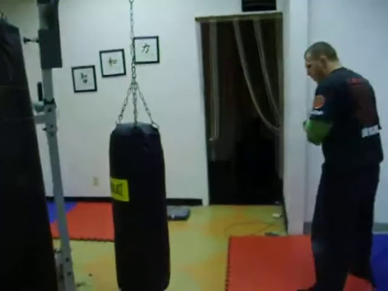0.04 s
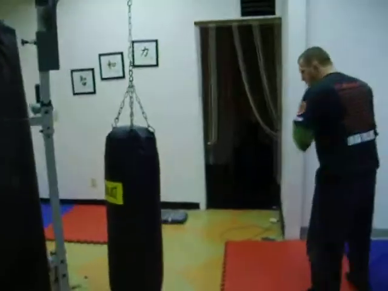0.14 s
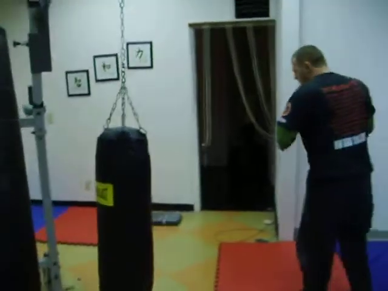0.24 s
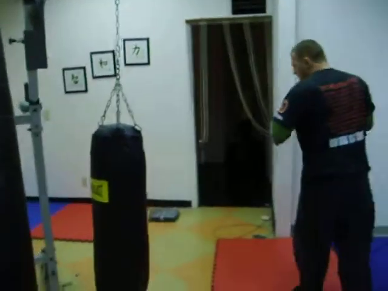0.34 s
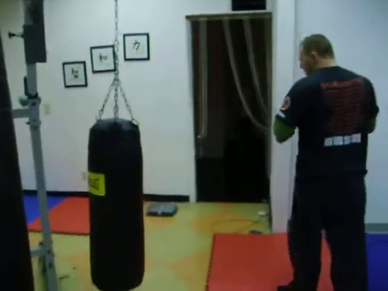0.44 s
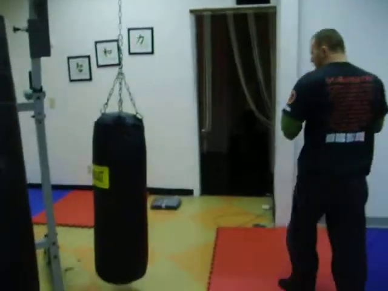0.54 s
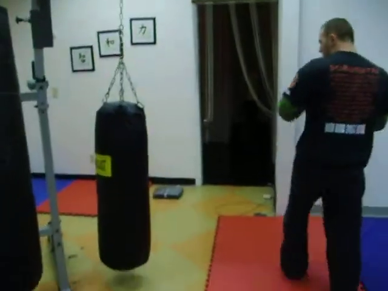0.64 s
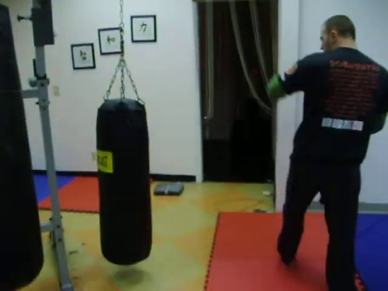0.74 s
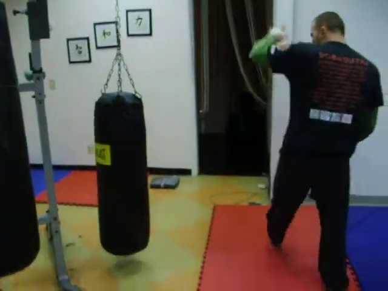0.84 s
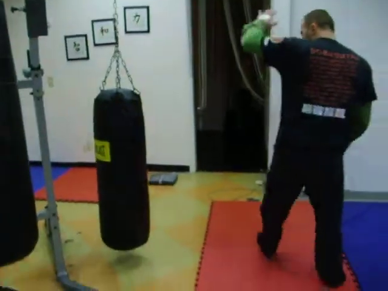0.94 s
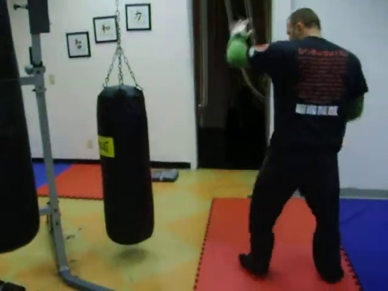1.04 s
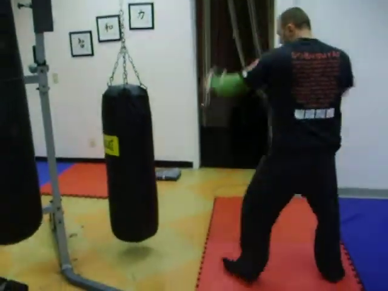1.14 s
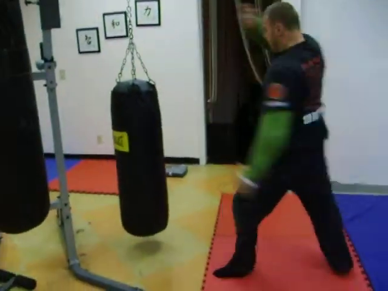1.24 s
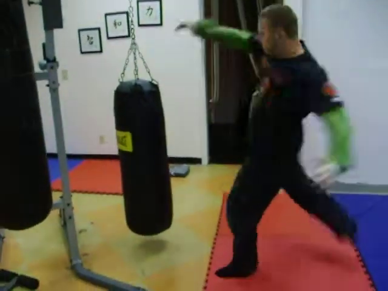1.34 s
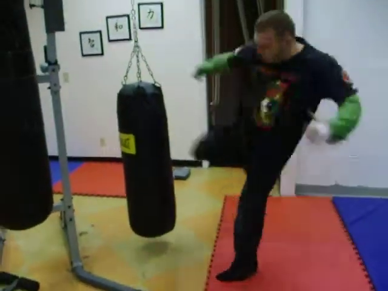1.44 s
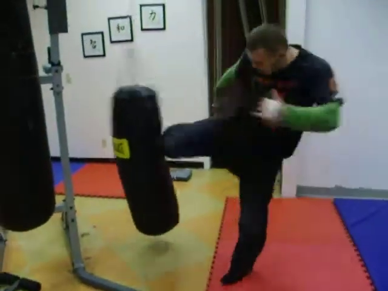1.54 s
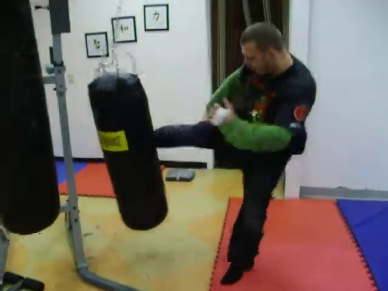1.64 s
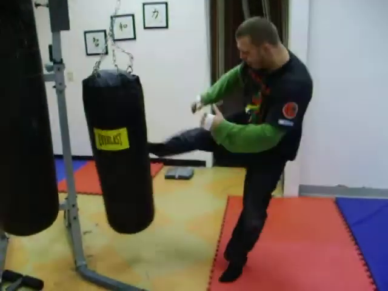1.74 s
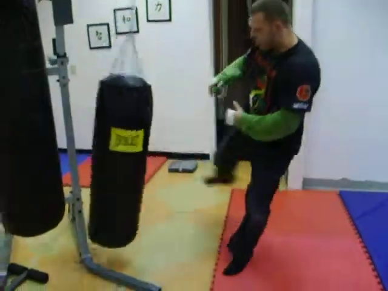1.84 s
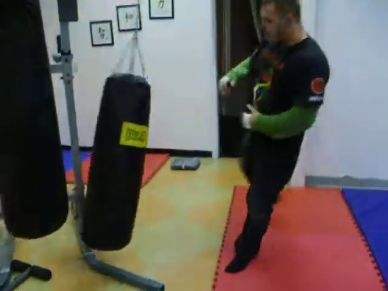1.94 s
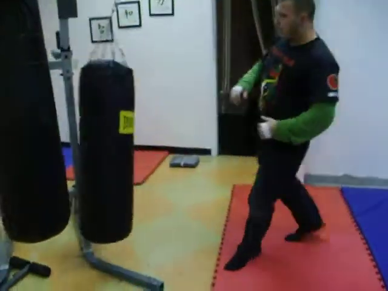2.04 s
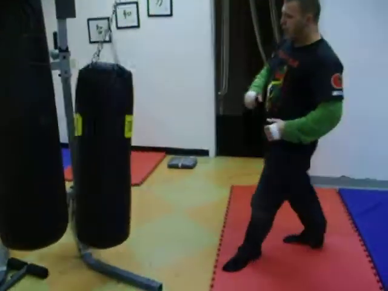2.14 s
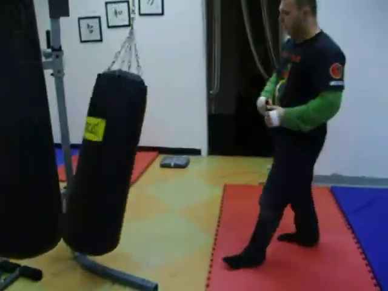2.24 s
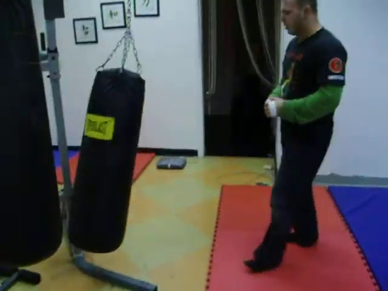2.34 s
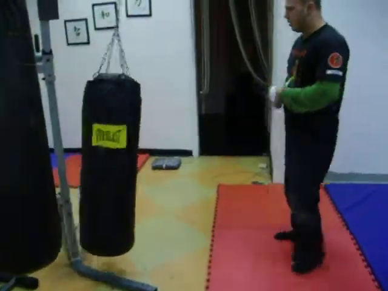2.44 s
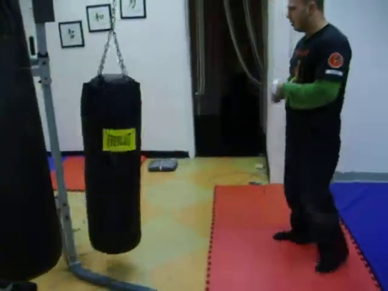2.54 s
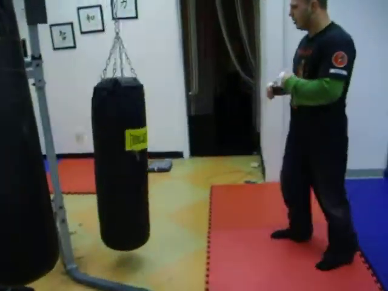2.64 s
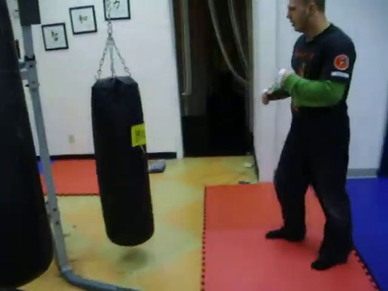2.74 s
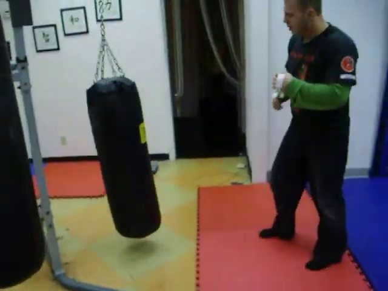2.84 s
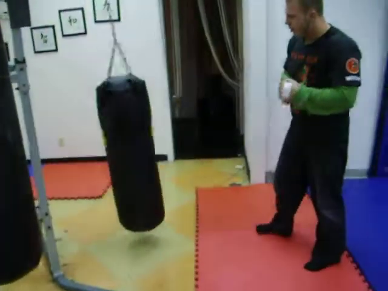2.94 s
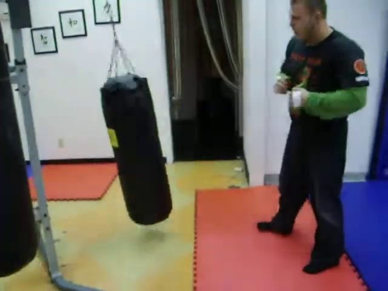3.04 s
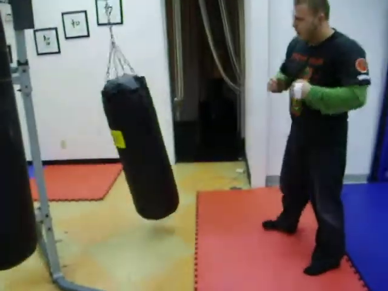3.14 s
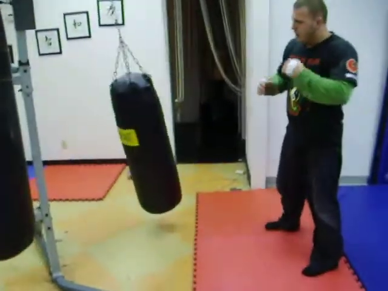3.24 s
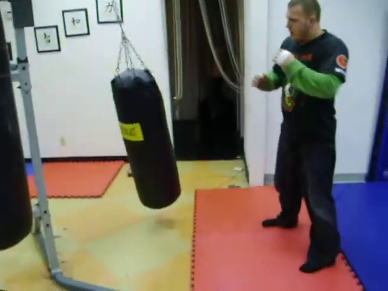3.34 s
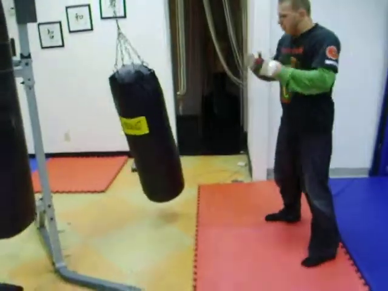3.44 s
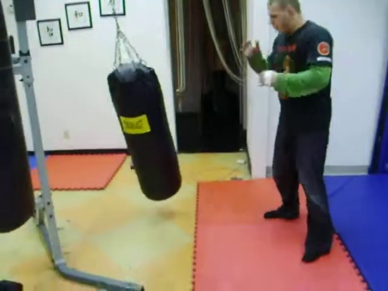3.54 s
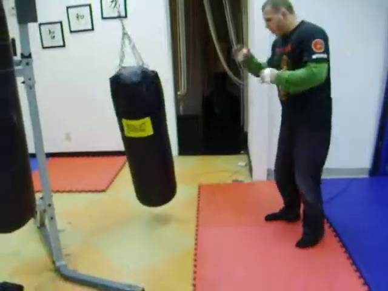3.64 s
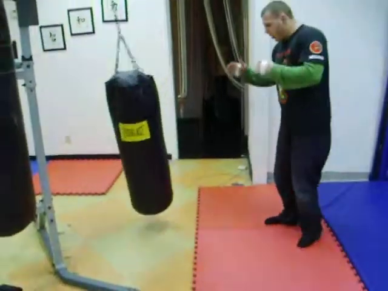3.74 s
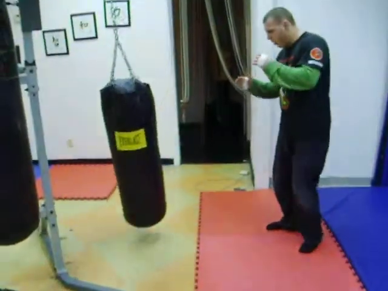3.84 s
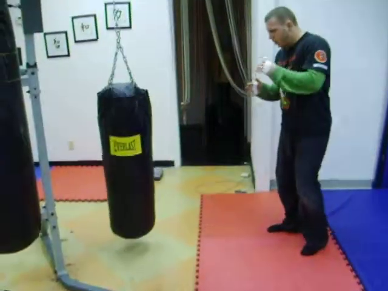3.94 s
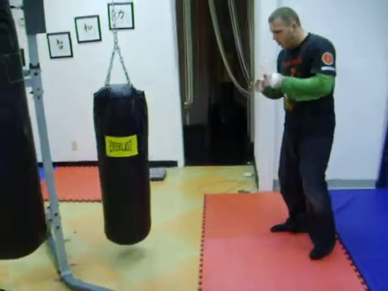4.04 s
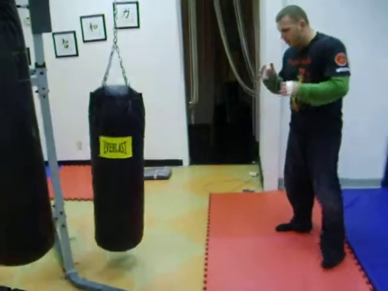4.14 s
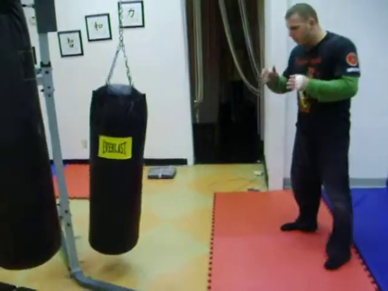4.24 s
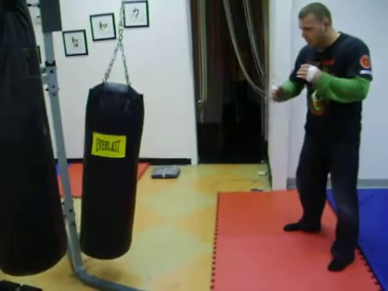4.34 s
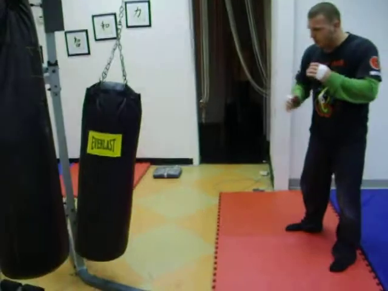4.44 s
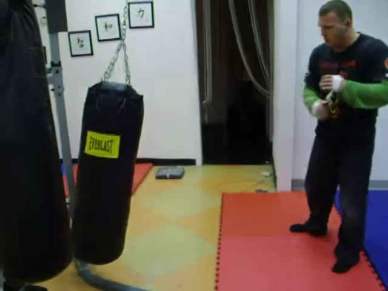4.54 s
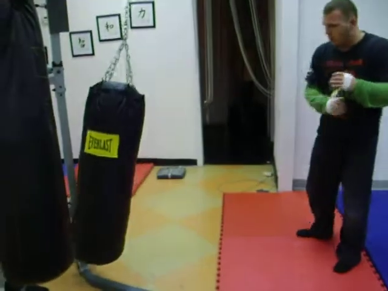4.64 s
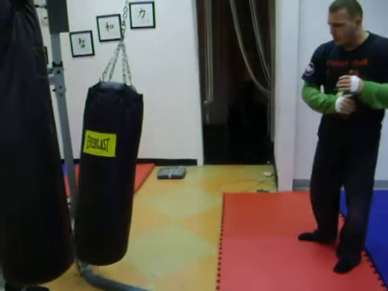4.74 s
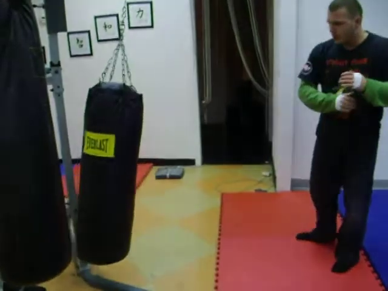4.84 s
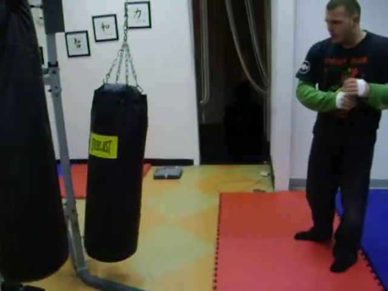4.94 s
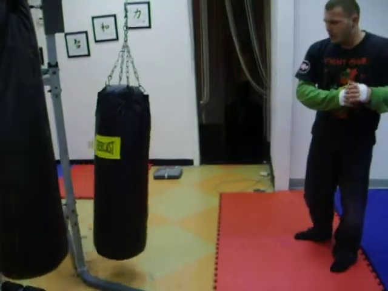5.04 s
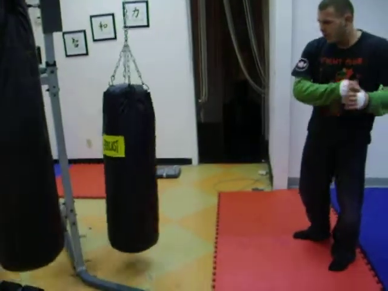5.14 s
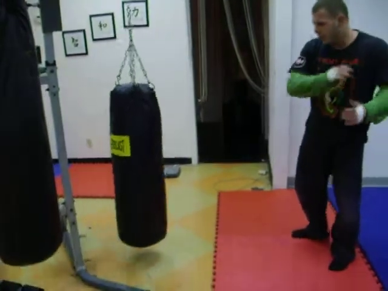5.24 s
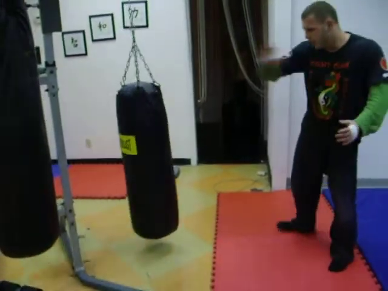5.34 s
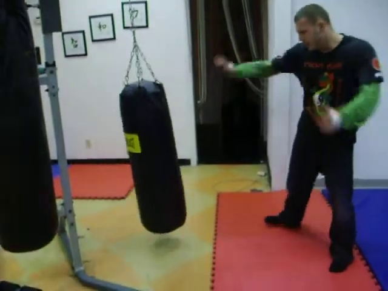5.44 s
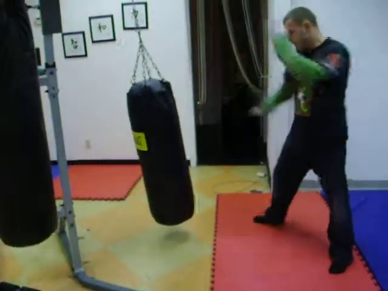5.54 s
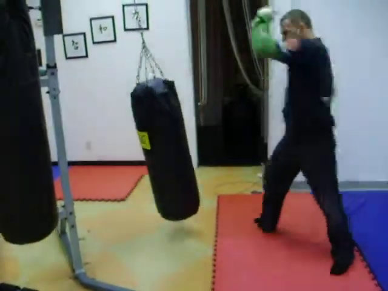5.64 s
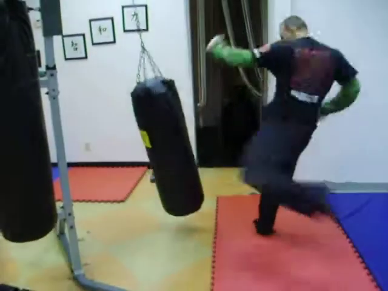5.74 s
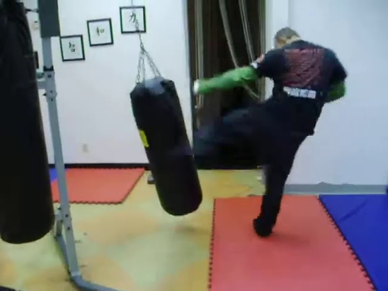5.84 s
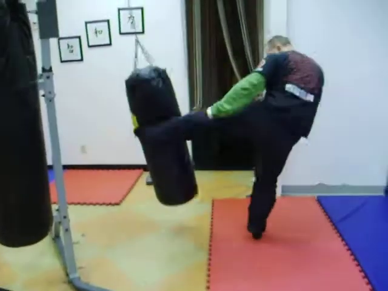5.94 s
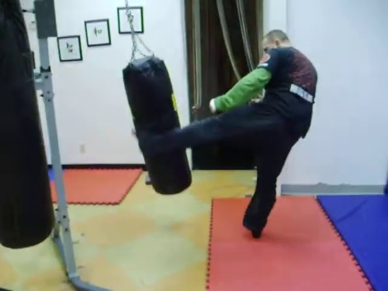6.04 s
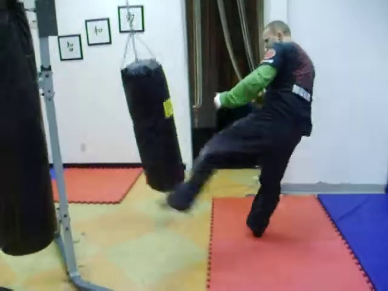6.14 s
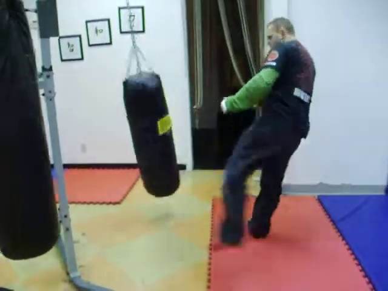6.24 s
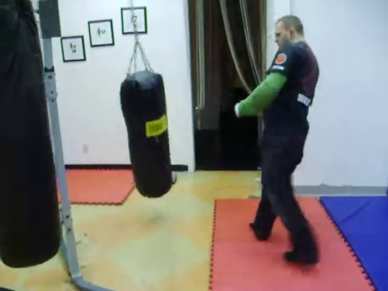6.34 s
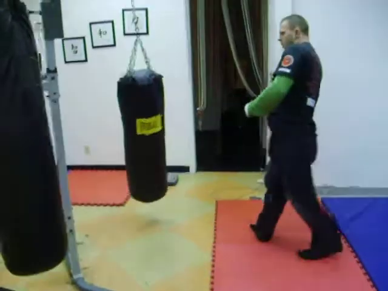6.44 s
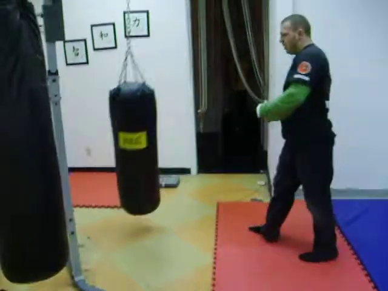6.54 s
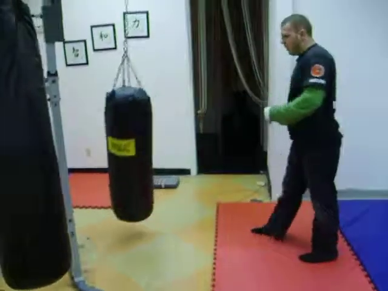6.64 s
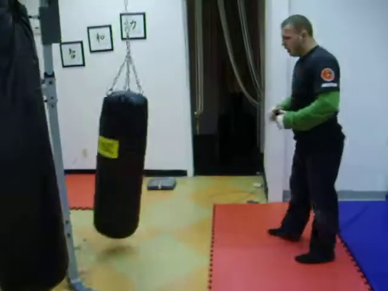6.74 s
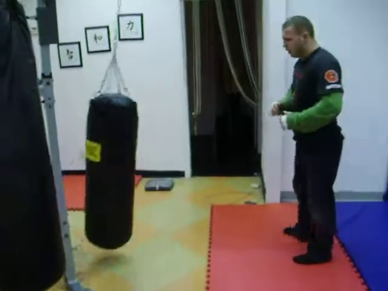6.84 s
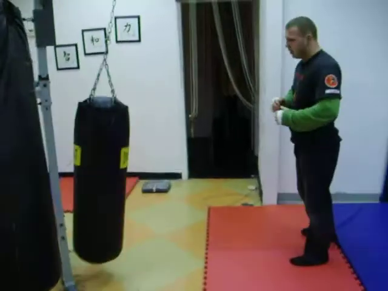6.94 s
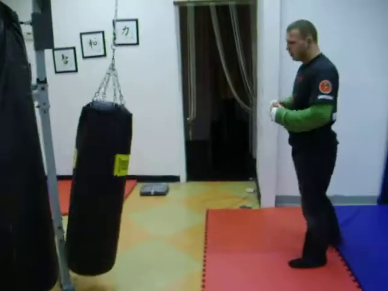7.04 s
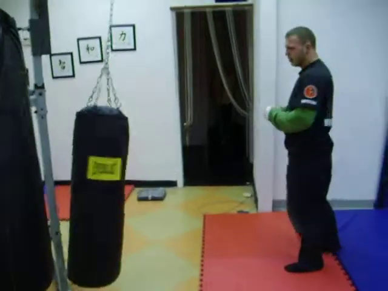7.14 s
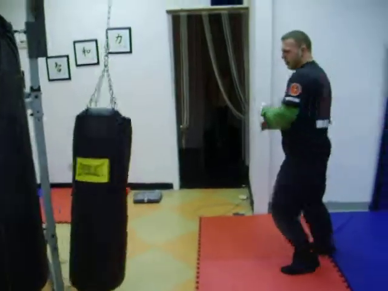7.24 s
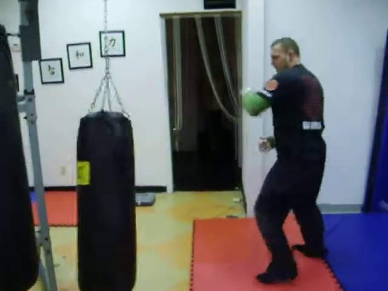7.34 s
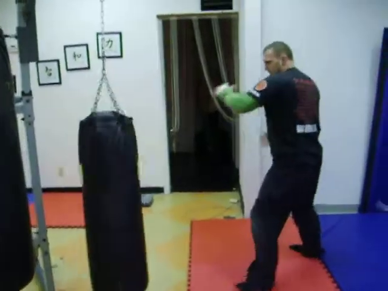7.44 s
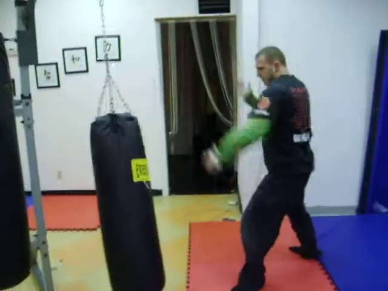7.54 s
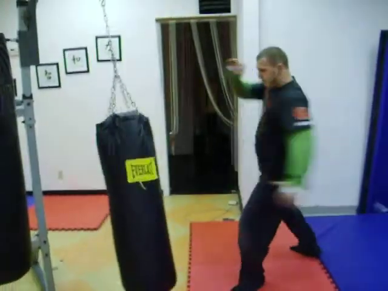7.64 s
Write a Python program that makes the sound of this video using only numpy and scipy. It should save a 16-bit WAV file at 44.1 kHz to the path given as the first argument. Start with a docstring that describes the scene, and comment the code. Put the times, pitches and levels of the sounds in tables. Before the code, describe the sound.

A heavy bag takes two booming kicks a few seconds apart, and its steel chain jingles in bursts over a faint hiss.

```python
"""Two hard kicks thud into a heavy bag in a small, bare gym and overload a camera's microphone.
Each is a slap of shin on vinyl, a thud in the filling and a boom in the room. The bag swings on its
chain: colliding links rattle in bursts, the swivel sticks and squeaks, the ceiling mount knocks.
Clothes rustle and feet scuff and land on the mat around the kicks. Underneath, the camera's
electronics add hiss, a thin whine, a low flutter and a few dry ticks."""
import sys
import numpy as np
from scipy import signal
from scipy.fft import rfft, irfft, next_fast_len
from scipy.io import wavfile
from scipy.ndimage import map_coordinates

SR = 44100
rng = np.random.default_rng(int(sys.argv[2]) if len(sys.argv) > 2 else 0)


def waveform_to_disk(signal):
    """Save audio, clipped to [-1, 1], as 16-bit WAV at the path in sys.argv[1]."""
    frames = np.transpose(np.atleast_2d(signal))
    scaled = np.clip(frames, -1, 1) * 32767
    samples = np.round(scaled).astype(np.int16)
    wavfile.write(sys.argv[1], SR, samples)


N = 339570
TIME = np.arange(N) / SR
SECOND = TIME[:SR]

# The two kicks. Each row: start in seconds, gains of slap-following thud, slap and boom in dB,
# thud attack in seconds, chain shake in dB, extra clank of the tossed bag in dB.
KICKS = [(1.5875, -4.5, -15.5, -11.5, 0.0066, -30, 8.5), (5.963, -4.5, -6.5, -15, 0.0042, -22, 3.5)]


def kicks(slap_t60=0.13, bloom_s=0.0056):
    """The shin slaps the vinyl cover, then sinks into the filling and sets the room booming."""
    # Tone of the cover and of the filling. Each row: frequency in Hz, relative level in dB.
    slap_tone = [(100, -64), (600, 2), (1700, 0), (3500, -4.5), (6000, -15.5), (15000, -32)]
    thud_tone = [(18, -26), (35, 2), (65, -22), (135, -7.5), (280, -7.5), (520, -6.5), (620, -10),
                 (750, -6.5), (1150, -12), (1700, -15), (3350, -22.5), (5000, -31), (9000, -39),
                 (15000, -48)]
    # Decay of the thud. Each row: frequency in Hz, t60 in seconds.
    thud_decay = [(40, 0.3), (130, 0.61), (400, 0.48), (1500, 0.36), (8000, 1)]
    # Modes of bag and room. Each row: frequency in Hz, relative level in dB, t60 in seconds.
    boom_modes = [(62.5, 4.5, 0.62), (90.5, -4.5, 0.64), (200.6, -13.5, 0.72), (271.4, 3.5, 0.26),
                  (355, -1, 0.16), (420, -2, 0.087), (536, -12.5, 0.46), (708, -19, 0.12),
                  (768, -8.5, 0.44)]
    out = np.zeros(N)
    for start, thud_db, slap_db, boom_db, swell_s, *_ in KICKS:
        slap = noise(slap_tone, SR) * fade(SECOND, slap_t60)
        thud = damped(noise(thud_tone, SR), thud_decay) * attack(swell_s)
        boom = struck(boom_modes) * attack(bloom_s)  # standing waves take a moment to build
        add(out, start, amp(slap_db) * slap + amp(thud_db) * thud + amp(boom_db) * boom)
    return out


def chain(ring_db=-2, scatter_db=3, low_hz=1700, high_hz=5600, tilt_per_db=0.14):
    """Collisions ring the steel, each burst favouring other links: heavy ones clank, light ones jingle."""
    # Modes of the chain and its hanger, in Hz.
    link_hz = [487, 900, 1125, 1486, 1822, 1971, 2218, 2410, 2488, 2738, 2871, 2966, 3225, 3331, 3394, 3687,
               4222, 4625, 6228, 8032, 8387, 8795, 9265, 9873]
    # Tone of a bare link click. Each row: frequency in Hz, relative level in dB.
    click_tone = [(150, -6), (250, -1.5), (367, 2), (500, 1), (620, 0), (802, 6.5), (1100, 4.5), (1220, 5),
                  (1450, 3), (2090, 0.5), (2810, 3.5), (3770, -2), (5540, -20.5), (9010, -32.5),
                  (12500, -36), (16000, -51)]
    hz, out = np.fft.rfftfreq(SR, 1 / SR), np.zeros(N)
    modes = np.array([resonance(hz, centre, width_hz=24 * np.sqrt(centre / 2500)) for centre in link_hz])
    below_low, below_high = (1 / (1 + (hz / edge) ** 8) for edge in (low_hz, high_hz))
    split = np.array([below_low, below_high - below_low, 1 - below_high])  # clank, body, jingle
    split *= amp(along(click_tone, hz))
    for start, db, length, jingle_db, rate in bursts():
        mode_db = ring_db - scatter_db * np.clip(rng.standard_normal(len(link_hz)), -2, 2)
        steel = 1 + amp(mode_db) @ modes
        tilt = np.clip(tilt_per_db * (jingle_db + 5), -1, 1)  # sharper contacts reach higher
        bands = split * np.maximum(1, hz / high_hz) ** tilt
        band_rms = np.sqrt(np.mean((bands * abs(steel)) ** 2, axis=1))
        colour = (amp([clank_db(start), 0, jingle_db]) / band_rms) @ bands
        rattle = irfft(rfft(contacts(length, rate)) * steel * colour, SR)[:SR // 2]
        add(out, start, amp(db) * gym(rattle))
    return out


def bursts(jerk_rate=1700, shake_rate=260, shakes=12):
    """The swinging bag jerks its chain; after a kick the slack links shake in weakening bursts."""
    # Jerks of the chain. Each row: start in seconds, gain in dB, length in seconds,
    # jingle in dB against the body of the rattle.
    jerks = [(0.0, -26.5, 0.021, -7), (0.191, -25, 0.045, -5.5), (1.694, -23.5, 0.024, -10),
             (1.76, -32.5, .035, -12), (1.922, -24, .02, -6), (1.985, -28, 0.039, -1.5),
             (2.061, -20, 0.04, 1), (2.178, -21, 0.021, 0), (2.28, -32, 0.038, 0),
             (2.352, -28, 0.028, -4.5), (2.403, -20.5, 0.029, -1.5), (2.495, -30, .015, -15),
             (2.585, -35, 0.019, 0.5), (2.689, -36, 0.016, 0.5), (2.849, -31, .018, 2),
             (2.972, -33, 0.016, -11), (3.164, -30.5, 0.0087, -5.5), (3.238, -41, 0.049, 1.5),
             (3.404, -20.5, 0.028, -3), (3.627, -26.5, 0.027, -5), (3.709, -33.5, 0.046, -6.5),
             (4.178, -29.5, 0.054, -3), (4.334, -26.5, 0.053, -2), (4.6, -24, 0.025, -3),
             (4.726, -27, .018, -3), (4.861, -24.5, .018, -3), (5.508, -41, 0.012, -1),
             (6.086, -18, 0.026, 0), (6.224, -17.5, .018, -2), (6.275, -20, 0.016, -4),
             (6.375, -5, 0.016, -8.5), (6.541, -21, 0.034, 0), (6.635, -21.5, 0.041, 0),
             (6.68, -12, 0.012, 0), (6.838, -19, 0.045, 2), (7.059, -21.5, 0.069, -1),
             (7.207, -21.5, 0.023, -3), (7.312, -30.5, 0.022, -3.5), (7.352, -26, 0.029, -1.5),
             (7.42, -24.5, 0.034, -2), (7.529, -30, 0.061, -4)]
    delay_s, gap_s, length_s = 0.065, 0.075, 0.062
    sag_db_per_s, jingle_db = 5.5, -5.5
    rows = [(*jerk, jerk_rate) for jerk in jerks]
    for kick, *_, shake_db, _ in KICKS:
        for k, (stagger, scatter_db) in enumerate(rng.uniform(-1, 1, (shakes, 2))):
            since = delay_s + gap_s * (k + 0.2 * stagger)
            db = shake_db - sag_db_per_s * since + scatter_db
            rows.append((kick + since, db, length_s, jingle_db, shake_rate))
    return rows


def clank_db(now, calm_db=-11, settle_s=1.88):
    """Low clank against the body of the rattle: heavier while the bag still tosses from a kick."""
    return calm_db + sum(toss_db * np.exp(-((now - kick) / settle_s) ** 2)
                         for kick, *_, toss_db in KICKS if now > kick)


def contacts(length, rate=1700, spread_db=4, snap_s=0.016):
    """Link after link collides, about rate times a second: a run of clicks that swells and stops."""
    progress = SECOND / length
    hits = (rng.random(SR) < rate / SR) * rng.choice([-1, 1], SR)
    clicks = hits * amp(spread_db * np.clip(rng.standard_normal(SR), -2, 2))
    clicks[0] = 2  # the contact that sets the others off
    onset = snap_s / max(length, snap_s)  # short bursts start at full force, longer ones creep in
    swell = np.minimum(1, onset + 2 * progress) * np.exp(-progress ** 3)
    run = clicks * swell
    return run * np.linalg.norm(swell) / np.linalg.norm(run)


def clinks(catch_s=0.018, clang_width_hz=830, high_hz=9280, high_width_hz=5200):
    """A taut link grinds on its neighbour and rings in a few bright bands."""
    # The tossed bag tugs at its rings. Each row: start in seconds, gain in dB, length in seconds.
    tugs = [(1.648, -28, 0.016), (1.796, -29, 0.043), (6.032, -24.5, 0.02), (6.135, -42, .035)]
    # Modes of those rings. Each row: frequency in Hz, width in Hz, relative level in dB.
    ring_modes = [(11070, 370, 1), (12450, 990, 0)]
    # A link catches the bag's full weight. Each row: start in seconds, clang pitch in Hz,
    # gains of the clang and of the high ring in dB.
    catches = [(2.063, 3660, -13.5, -18), (2.178, 3850, -20, -37), (3.403, 1650, -31, -40),
               (3.63, 2530, -30, -48), (4.863, 2490, -27.5, -44), (6.088, 3400, -15.5, -37),
               (6.376, 3420, -11.5, -9.5), (6.68, 3430, -19, -23)]
    notes = [(start, pitch_hz, width_hz, db + ring_db, length)
             for start, db, length in tugs for pitch_hz, width_hz, ring_db in ring_modes]
    for start, pitch_hz, clang_db, high_db in catches:
        notes.append((start, pitch_hz, clang_width_hz, clang_db, catch_s))
        notes.append((start, high_hz, high_width_hz, high_db, catch_s))
    out = np.zeros(N)
    for start, pitch_hz, width_hz, db, length in notes:
        grind = contacts(length)[:SR // 2]
        clink = filtered(grind, lambda hz: resonance(hz, pitch_hz, width_hz) ** 2)
        add(out, start, amp(db) * gym(clink) * np.linalg.norm(grind) / np.linalg.norm(clink))
    return out


def swivel(gain_db=3, waver_db=3.5, crest=0.97):
    """Steel sticks and slips on the hook: an unsteady, rising squeak, its octave strongest midway."""
    # Squeaks. Each row: start and length in seconds, first and top pitch in Hz, relative level in dB,
    # octave in dB against the fundamental, jitter as a share of the pitch.
    squeaks = [(1.909, 0.054, 1960, 2094, -26.5, -8, .01), (6.916, 0.04, 2850, 2890, -18.5, -26, .022),
               (7.487, .15, 1785, 2120, -22.5, 4.5, 0.0067)]
    out = np.zeros(N)
    for start, length, first_hz, top_hz, db, octave_db, jitter in squeaks:
        progress = np.clip((TIME - start) / length, 0, 1)
        hz = first_hz + (top_hz - first_hz) * np.sin(np.pi / 2 * progress / crest)
        phase = 2 * np.pi * np.cumsum(hz * (1 + jitter * wobble(300))) / SR
        pressure = abs(np.sin(np.pi * progress ** 1.3))
        octave = amp(octave_db) * pressure ** 2.2 * np.sin(2 * phase)
        out += amp(db) * (pressure * np.sin(phase) + octave)
    return out * amp(gain_db + waver_db * wobble(120))


def mount(gain_db=-9, rise_s=0.0025):
    """The chain snaps taut and knocks its mount, which makes the ceiling beam hum."""
    # Knocks. Each row: start in seconds, relative level in dB.
    knocks = [(1.702, -26), (2.06, -25), (2.185, -28.5), (2.402, -25), (2.548, -31.5), (2.848, -31.5),
              (3.271, -39.5), (6.454, -24), (6.75, -29.5)]
    # Modes of the beam. Each row: frequency in Hz, relative level in dB, t60 in seconds.
    beam_modes = [(63, -6, 1), (133.5, 0.5, 0.69), (193.5, 8, 0.48), (254, 1.5, 0.19), (325, -0.5, 0.18),
                  (376, -1, 0.25), (384, -3, 0.61), (487, -7, 0.88)]
    out = np.zeros(N)
    for start, db in knocks:
        add(out, start, amp(db + gain_db) * struck(beam_modes) * attack(rise_s))
    return out


def steps(t60=0.42, rise_s=0.011):
    """A foot comes down dully on the foam mat."""
    # Footfalls. Each row: start in seconds, gain in dB.
    footfalls = [(1.93, -27), (2.405, -33), (6.377, -22), (6.45, -20.5)]
    # Tone of the mat. Each row: frequency in Hz, relative level in dB.
    mat_tone = [(40, -37), (130, -6), (240, -4.5), (380, -4), (520, -24), (1200, -11), (5000, -60)]
    out = np.zeros(N)
    for start, db in footfalls:
        add(out, start, amp(db) * noise(mat_tone, SR) * fade(SECOND, t60) * attack(rise_s))
    return out


def clothes(scuff_db=-3, swish_db=-1, grain_db=1.8):
    """Socks scuff the mat and sleeves swish as the kicker winds up; each move swells and fades."""
    # Moves. Each row: peak time and half length in seconds, relative scuff and swish levels in dB.
    moves = [(0.525, 0.078, -45, -57), (0.69, 0.12, -47.5, -52), (1.236, .02, -53, -49),
             (1.37, 0.32, -66, -55), (1.411, 0.051, -50, -43), (1.582, 0.042, -47, -40.5),
             (5.325, 0.13, -48, -52), (5.5, 0.072, -43.5, -54), (5.778, 0.074, -53, -43),
             (5.939, 0.014, -37, -47)]
    # Tone of socks and of sleeves. Each row: frequency in Hz, relative level in dB.
    scuff_tone = [(150, 5), (400, -2), (750, 3.5), (1500, -2), (3000, -46)]
    swish_tone = [(600, -7), (1800, -5.5), (4000, -12), (8000, -19.5), (15000, -31)]
    scuff = sum(amp(db + scuff_db) * hump(peak, half_length) for peak, half_length, db, _ in moves)
    swish = sum(amp(db + swish_db) * hump(peak, half_length) for peak, half_length, _, db in moves)
    return (scuff * noise(scuff_tone, N) + swish * noise(swish_tone, N)) * amp(grain_db * wobble(150))


def gym(x, direct_db=-8, wet_db=-1.35, build_s=0.00011):
    """Bare walls answer almost at once; the echo pattern is new wherever the chain has swung to."""
    # Reverb time. Each row: frequency in Hz, t60 in seconds.
    room_decay = [(150, 1), (600, 0.55), (1400, 0.52), (3500, 0.44), (9500, 0.36), (15000, 0.26)]
    tail = damped(rng.standard_normal(SR // 2), room_decay) * attack(build_s)[:SR // 2]
    reverb = signal.fftconvolve(x, tail / np.linalg.norm(tail))[:len(x)]
    return amp(direct_db) * x + amp(wet_db) * reverb


def camera(hiss_db=-51, whine_db=-1):
    """Steady hiss with the thin whine and flutter of the electronics."""
    # Tone of the hiss and partials of the whine. Each row: frequency in Hz, relative level in dB.
    hiss_tone = [(20, -6), (60, 1), (150, -12.5), (400, -1), (1000, -7), (2500, -14), (5000, -21.5),
                 (10000, -30), (16000, -41)]
    partials = [(947.5, -61), (1346, -64), (2169, -68), (6751, -66.5), (13501, -72), (15369, -81)]
    whine = sum(amp(db + whine_db) * np.sqrt(2) * np.sin(2 * np.pi * hz * TIME + 0.41 * wobble(17))
                for hz, db in partials)
    return amp(hiss_db) * noise(hiss_tone, N) + whine + flutter()


def flutter(frame_hz=25, gain_db=-35, spread_db=3, repeat_chance=0.65, repeat_db=-2):
    """Electrical interference: once a frame the signal dips sharply and rebounds, often twice."""
    first_s, rebound_s, latest_repeat_s = 0.0315, 0.00211, 0.00772
    out, t = np.zeros(N), SECOND[:SR // 40]
    grit = 1 + 0.22 * wobble(1100)

    def pulse(at, rise_s=0.0004, fall_s=0.002):
        age = np.maximum(t - at, 0)
        return 2 * np.exp(-age / fall_s) * (1 - np.exp(-age / rise_s))

    def dip(at):
        return 0.85 * pulse(at + rebound_s) - pulse(at)

    for k, (size, chance, delay) in enumerate(rng.random((int(N / SR * frame_hz), 3))):
        repeat_s = rebound_s / 2 + delay * (latest_repeat_s - rebound_s / 2)
        dips = dip(0) + (chance < repeat_chance) * amp(repeat_db) * dip(repeat_s)
        gain = amp(gain_db + spread_db * (size - 0.5))
        add(out, first_s + k / frame_hz, gain * dips * grit[k * len(t):][:len(t)])
    return out


def ticks(gain_db=2, t60=0.0057):
    """Now and then the electronics tick, dry and very short."""
    # Ticks. Each row: start in seconds, relative level in dB.
    cues = [(3.5724, -44), (4.1375, -46), (5.171, -35.5)]
    # Tone of a tick. Each row: frequency in Hz, relative level in dB.
    tick_tone = [(500, -2), (2500, 12), (8000, 3), (16000, -14)]
    out = np.zeros(N)
    for start, db in cues:
        add(out, start, amp(db + gain_db) * noise(tick_tone, SR) * fade(SECOND, t60))
    return out


def amp(db):
    """Decibels to gain."""
    return 10 ** (np.asarray(db) / 20)


def along(points, hz):
    """Read a curve of (Hz, value) points on a log frequency axis."""
    freqs, values = np.transpose(points)
    return np.interp(np.log(hz + 1), np.log(freqs + 1), values)


def add(track, start_s, sound):
    """Mix a sound into a track from start_s on."""
    start = max(0, round(start_s * SR))
    track[start:start + len(sound)] += sound[:N - start]


def filtered(x, response):
    """Shape x with a gain that depends on frequency."""
    size = next_fast_len(len(x) + SR // 2)
    return irfft(rfft(x, size) * response(np.fft.rfftfreq(size, 1 / SR)), size)[:len(x)]


def noise(tone, size):
    """Coloured noise of rms 1."""
    x = filtered(rng.standard_normal(size), lambda hz: amp(along(tone, hz)))
    return x / np.sqrt(np.mean(x ** 2) + 1e-20)


def wobble(rate):
    """A smooth random curve, rate knots a second."""
    return map_coordinates(rng.standard_normal(int(N * rate / SR) + 4), [TIME * rate])


def attack(rise_s):
    """A one-second envelope that rises towards 1 with time constant rise_s."""
    return 1 - np.exp(-SECOND / rise_s)


def fade(t, t60):
    """Exponential decay, 60 dB down at t60."""
    return np.exp(-np.log(1000) * t / t60)


def hump(peak_s, half_length):
    """A smooth rise and fall around peak_s."""
    return 1 / np.cosh(np.clip(2 * (TIME - peak_s) / half_length, -20, 20))


def damped(x, decays):
    """Each frequency of x dies at its own speed."""
    hz, t, spectra = signal.stft(x, SR, nperseg=256)
    return signal.istft(spectra * fade(t, along(decays, hz)[:, None]), SR, nperseg=256)[1][:len(x)]


def struck(modes):
    """One second of struck modes, with random phases and slightly varied strengths."""
    return sum(amp(db + rng.standard_normal()) * fade(SECOND, t60)
               * np.sin(2 * np.pi * (hz * SECOND + rng.random())) for hz, db, t60 in modes)


def resonance(hz, centre_hz, width_hz):
    """Response of one mode, 1 at its centre."""
    return 1j * hz * width_hz / (centre_hz ** 2 - hz ** 2 + 1j * hz * width_hz)


def scene():
    """Bag, chain, kicker and electronics mixed in mono."""
    squeak = gym(swivel(), direct_db=-4.5, wet_db=-6.5)
    return (kicks() + mount() + steps() + chain() + clinks() + squeak + clothes() + camera() + ticks())[None]


def record(dry, top_hz=16100, ceiling=0.74, hardness=10):
    """The overloaded input stage flattens the loudest peaks; nothing passes above top_hz."""
    heard = filtered(dry[0], lambda hz: hz < top_hz)
    flattened = heard / (1 + abs(heard / ceiling) ** hardness) ** (1 / hardness)
    return filtered(flattened, lambda hz: hz < top_hz)[None]


dry = scene()
out = record(dry)
waveform_to_disk(out)
```